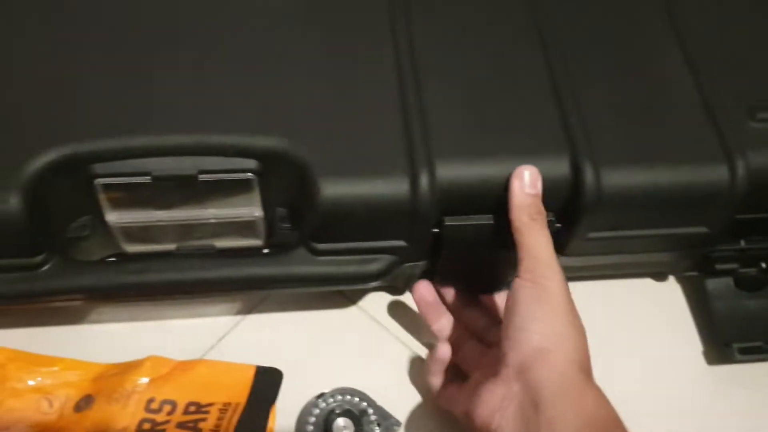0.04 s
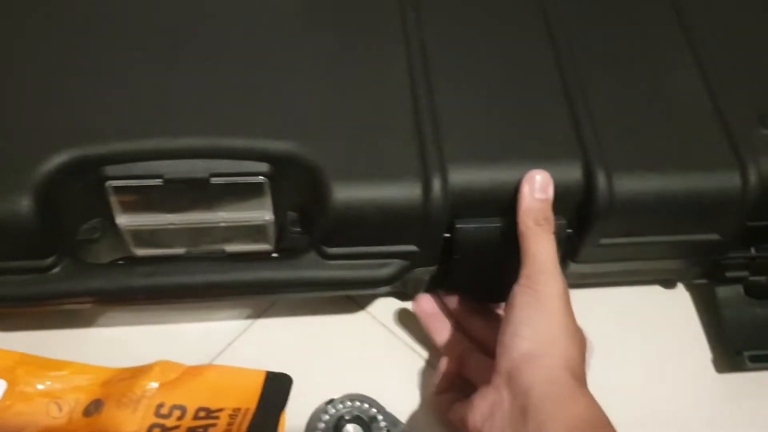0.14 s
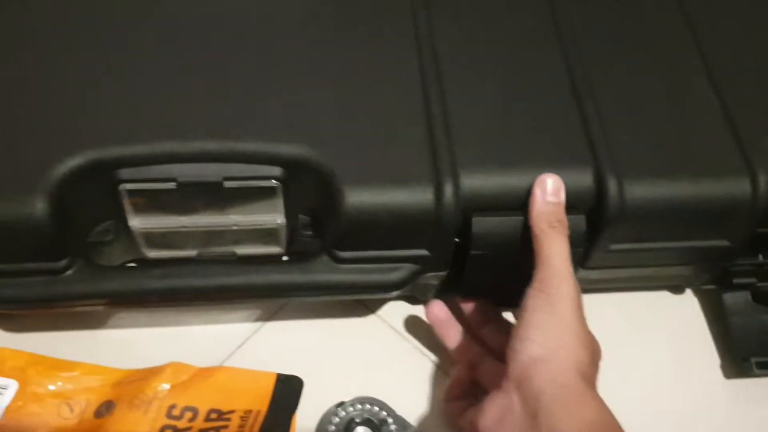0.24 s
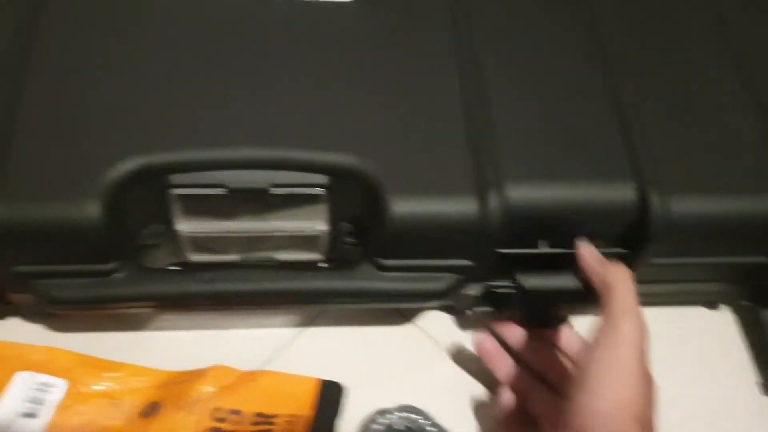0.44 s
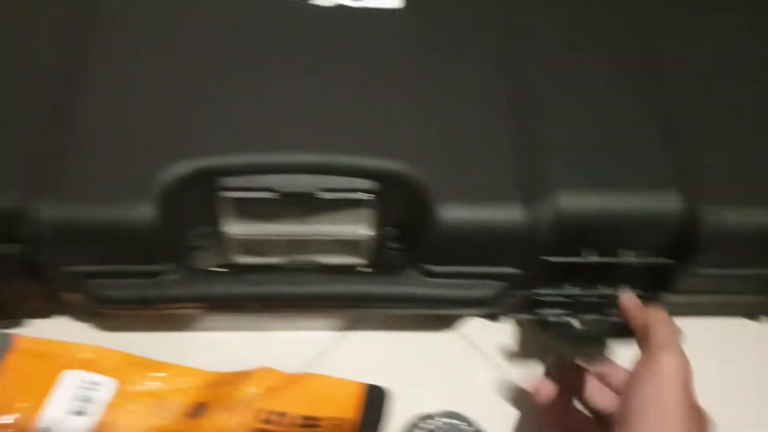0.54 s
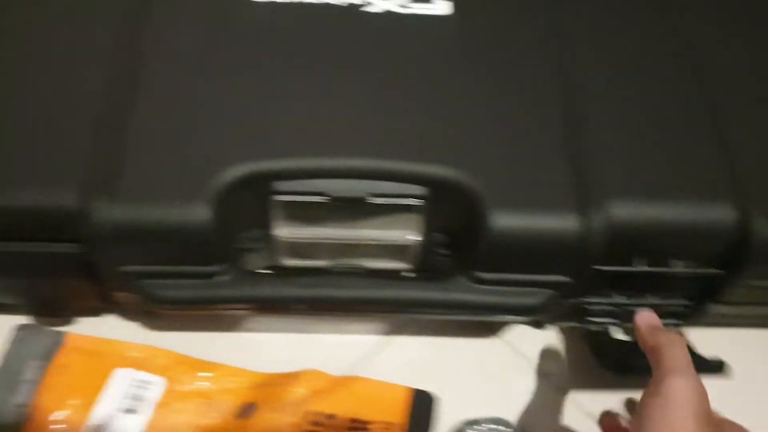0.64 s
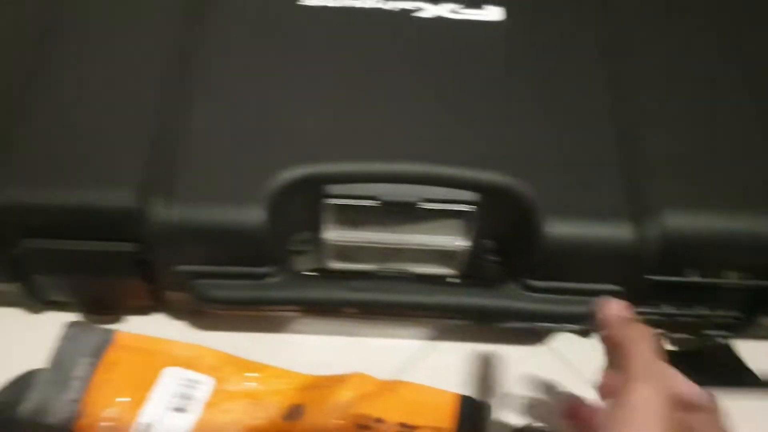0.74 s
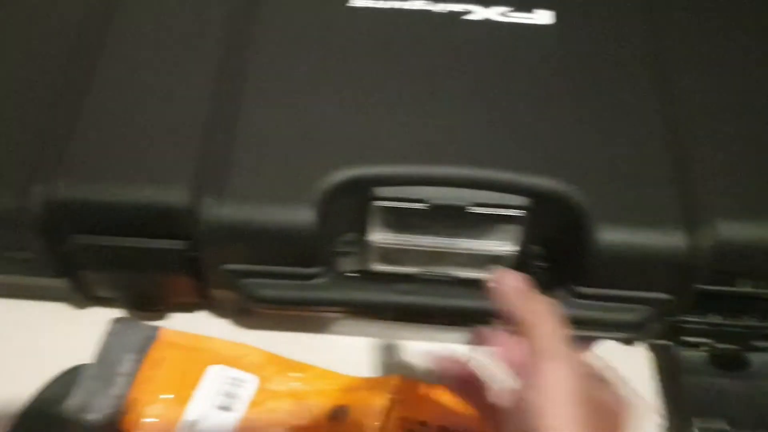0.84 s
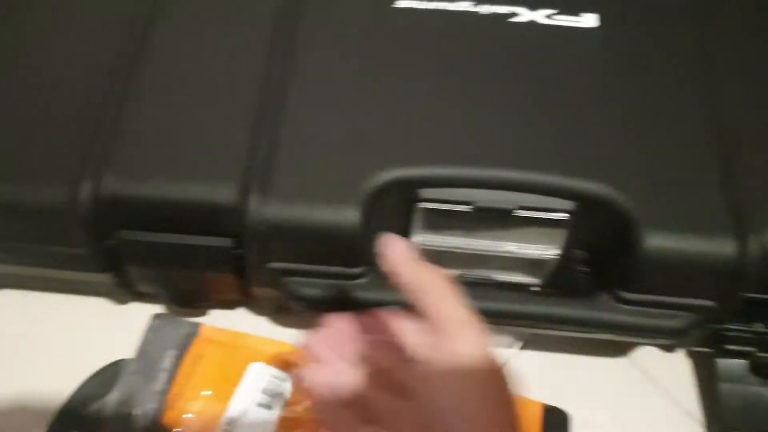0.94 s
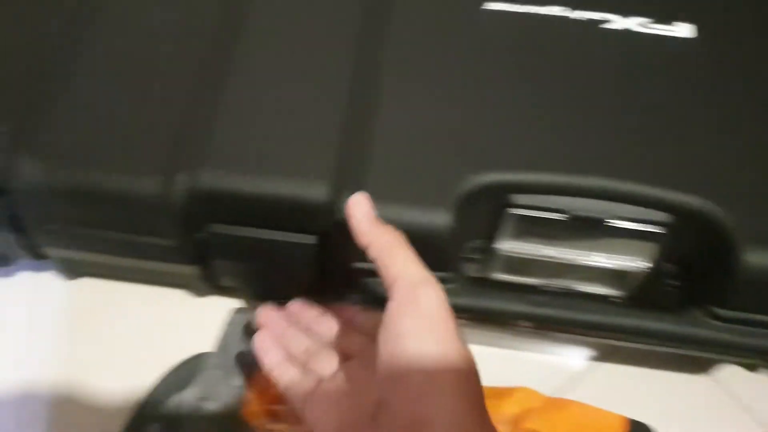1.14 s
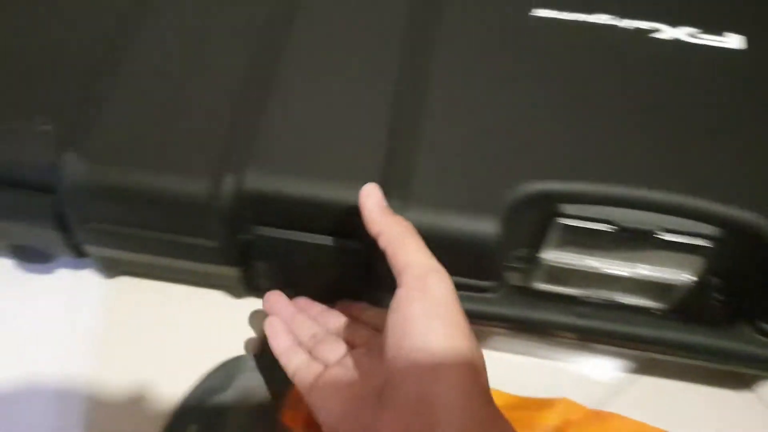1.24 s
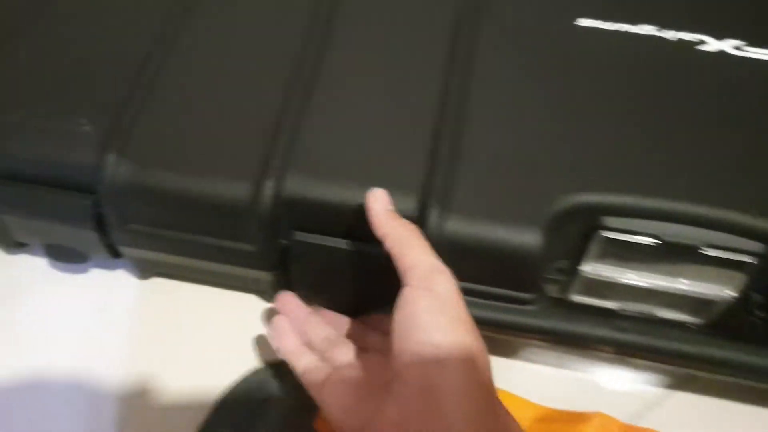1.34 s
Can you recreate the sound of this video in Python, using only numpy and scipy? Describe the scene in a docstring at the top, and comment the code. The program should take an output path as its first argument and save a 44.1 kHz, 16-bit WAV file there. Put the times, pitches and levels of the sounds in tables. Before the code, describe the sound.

One loud, sharp latch snap near the start, hard and slightly clipped, booms briefly in the hollow case shell and the live room; afterwards only dull little hand touches, soft hiss and low handling rumble close to the microphone.

```python
"""Soft hiss, thin hum, low rumble and slow hand rubs lie under the scene, shaped from noise and two tones.
A big hard case then opens in a tiled room, close by and a little to the left: a decaying sine thumps
as the lid springs up, noise cracks clatter for a hundredth of a second, and latch and shell modes ring.
The room answers with a noise tail; later the loose latch and the hand knock softly on the same modes."""
import sys
import numpy as np
from scipy import signal
from scipy.io import wavfile

SR = 44100
rng = np.random.default_rng(int(sys.argv[2]) if len(sys.argv) > 2 else 0)


def store_pcm(level_fs):
    """Save levels as 16-bit WAV."""
    pcm = np.round(np.clip(level_fs, -1, 1) * 32767).astype(np.int16)
    wavfile.write(sys.argv[1], SR, np.atleast_2d(pcm).T)


N = 61739
TIME = np.arange(N) / SR   # seconds

# Catch hitting lip and hinge: start_s, level_db, brightness_hz, left_minus_right_db
SNAPS = [(.2155, -7.5, 14000, 23), (0.2161, -5.5, 5000, 8), (0.2166, 3.5, 4500, 12), (.2192, -3, 5400, 12),
         (.2204, -6.5, 11000, 4.5), (.2219, -3.5, 12000, 8.5), (.2226, -3.5, 4510, 18.5),
         (.2236, -2, 3500, -16), (.2254, 2, 2000, 4.5)]
# Dry crack of one contact: pitch_hz, level_db_per_hz
CRACK_COLOUR = [(150, -13), (400, -9.5), (800, 3), (1500, -3.5), (2600, 4.5), (3700, -3.5), (5200, -20.5),
                (7400, 12.5), (9500, -14.5), (15000, -0.5)]
# Stereo likeness of cracks and rubs: pitch_hz, left_right_likeness (1 = same, 0 = unrelated)
CRACK_LIKENESS = [(100, 1), (1500, 0.7), (8000, 0.36)]
# Shading of the microphone's two ports: pitch_hz, left_minus_right_db
CRACK_PAN = [(400, -5.5), (1300, 1.5), (3000, 4), (5500, -5.5), (9000, -16), (14000, 4)]
CRACK_DB, CRACK_T60_S = 5, 0.0079
# Modes of the latch and the wall around it: pitch_hz, level_db, t60_s
LATCH_MODES = [(701.4, -21.5, .09), (788, -24.5, 0.13), (863, -29.5, 0.069), (1188, -23.5, 0.11),
               (1367, -23.5, 0.094), (1664, -16.5, 0.069), (1760, -35.5, 0.0305), (2330, -24, 0.097),
               (2462, -12, 0.041), (2598, -19.5, 0.055), (3143, -22.5, 0.044), (3504, -16.5, 0.033),
               (4000, -14.5, 0.019), (7160, -19, 0.021), (7380, -15.5, 0.024)]
# The latch springs off its catch
SPRING_S, SPRING_DB, SPRING_HZ, SPRING_PAN_DB = .2162, -5.5, 12200, 29.5

# Modes of the hollow shell: pitch_hz, level_db, t60_s
SHELL_MODES = [(51.6, -28, 0.52), (66.7, -32.5, 0.51), (112.2, -24, 0.27), (130.7, -27.5, 0.4),
               (165, -22, 0.26), (191.4, -26, 0.33), (213.8, -25.5, 0.22), (270, -28, 0.24),
               (313, -20.5, 0.039), (386.2, -24.5, 0.11), (414, -40.5, .25), (508, -35.5, 0.29)]
RELEASE_S, RELEASE_DB, RELEASE_HZ = .2185, 2.5, 1510   # the freed lid sets the shell ringing
THUMP_S, THUMP_HZ, THUMP_DB = .2138, 201.2, -8.5   # the lid's panel springs up
THUMP_ATTACK_S, THUMP_HOLD_S, THUMP_T60_S = 0.0084, 0.00884, 0.022
CASE_PAN_DB = 5   # left minus right

# Soft knocks of latch and hand: start_s, level_db, brightness_hz, low_edge_hz
KNOCKS = [(0.4981, -21, 2390, 260), (0.5013, -28, 1900, 260), (0.51, -21.5, 130, 40.77),
          (0.7456, -25.5, 326, 153), (0.764, -31, 790, 198), (0.931, -21.5, 433, 294),
          (.949, -27, 280, 150), (0.9858, -26, 510, 200), (1.321, -34.5, 500, 202), (1.367, -30, 54.7, 30)]
# Dry sound of a light touch: pitch_hz, level_db_per_hz
TAP_COLOUR = [(150, -9), (400, 7), (900, -1), (1500, -2), (2400, -3.5), (3400, -13), (8000, -30),
              (15000, -40)]
KNOCK_SHELL_DB, KNOCK_LATCH_DB = 1, -22
KNOCK_SHELL_DAMPING = 0.5   # factor on the shell's t60

# Hand sliding on the case: middle_s, half_length_s, level_db
RUBS = [(-0, 0.021, -60), (0.103, 0.062, -58), (0.776, 0.031, -57), (0.962, 0.039, -60),
        (1.345, 0.049, -58)]
# Colour of the sliding skin: pitch_hz, level_db_per_hz
RUB_COLOUR = [(50, -20), (130, -2.5), (220, 0), (400, -2.5), (700, -8), (1500, -12), (3000, -18),
              (6000, -35), (15000, -47)]

# Colour of the room's answer: pitch_hz, level_db_per_hz
ROOM_COLOUR = [(50, -18.5), (110, -1), (200, -7), (400, 1), (800, 2), (1500, -4), (2500, -1.5),
               (3800, -13.5), (5000, -14.5), (7500, -18.5), (10000, -24), (15000, -22.5)]
# Decay of the room: pitch_hz, t60_s
ROOM_T60 = [(60, 0.55), (130, 0.62), (220, 0.45), (600, 0.33), (2000, 0.36), (6000, 0.37), (15000, 0.34)]
# Stereo likeness of room and rumble: pitch_hz, left_right_likeness (below 0 plays as 0)
ROOM_LIKENESS = [(60, 1), (240, 1), (950, 0.15), (3770, -0.7), (15000, -0.05)]
ROOM_DB, ROOM_PAN_DB = -6, 3.5
ROOM_DELAY_S, ROOM_BUILD_S = 0.00087, 0.011
SCATTER_S, SCATTER_DB, SCATTER_HZ = .219, 9.5, 15000   # the clatter as the walls receive it: one broad click
LATCH_SEND_DB, CASE_SEND_DB = -15.5, -13   # shares of latch and case sent to the room

# Colour of the steady hiss: pitch_hz, level_db_per_hz
HISS_COLOUR = [(30, -12.5), (50, 0), (90, -17), (170, -2.5), (260, -14.5), (450, -11), (600, -12),
               (900, -13), (1500, -12.5), (2300, -11), (3600, -15), (4800, -29), (7000, -24), (9000, -56),
               (16000, -48.5)]
# Stereo likeness of the hiss: pitch_hz, left_right_likeness (below 0 plays as 0)
HISS_LIKENESS = [(60, 0.91), (240, 1), (950, -0.016), (3770, -0.43), (15000, -0.2)]
# Side of the hiss: pitch_hz, left_minus_right_db
HISS_PAN = [(60, 10.5), (180, 8), (550, 5), (1650, 9.5), (4970, 5.5), (15000, -39)]
HISS_DB = -57
# Thin wavering tones: pitch_hz, level_db
HUM = [(582, -69.5), (3441, -73)]
HUM_WAVER = 1   # depth beside the steady part
# Handling rumble: time_s, level_db
RUMBLE_LEVEL = [(0, -53.5), (.1, -64.5), (.48, -59), (.54, -48), (.65, -55.5), (.8, -61.5), (1.0, -62),
                (1.1, -66), (1.3, -68), (1.39, -51)]
# Colour of the rumble: pitch_hz, level_db_per_hz
RUMBLE_COLOUR = [(30, -22), (48, 1), (70, -5), (100, -17.5), (300, -31.5), (900, -34.5), (4000, -88)]
# Highest hiss: time_s, level_db
TREBLE_LEVEL = [(0, -71), (.2, -71.5), (.5, -70.5), (.76, -72.5), (.9, -83.5), (1.25, -80.5), (1.29, -69.5),
                (1.4, -70.5)]
# Colour of the highest hiss: pitch_hz, level_db_per_hz
TREBLE_COLOUR = [(2000, -48), (6000, 2.5), (9000, -20), (13500, 8.5), (16000, -10)]
MIC_LOW_HZ, CUTOFF_HZ = 36.2, 15400


def latch():
    """The latch springs free and rings in its modes; each contact of its catch adds a dry crack."""
    spring = contact(SPRING_S, SPRING_DB, SPRING_HZ)
    out = pan(SPRING_PAN_DB) * through(spring, ringing(LATCH_MODES))
    bursts = cracks(CRACK_COLOUR, count=len(SNAPS))
    for (start_s, level_db, bright_hz, pan_db), burst in zip(SNAPS, bursts):
        click = contact(start_s, level_db + CRACK_DB, bright_hz)
        out = out + pan(pan_db) * through(click, burst)
    return out


def lid():
    """The freed panel swings for a few cycles as a decaying sine; the shell's modes boom after it."""
    t = np.maximum(TIME - THUMP_S, 0)
    attack = np.minimum(t / THUMP_ATTACK_S, 1)
    swing = attack * fade(t - THUMP_ATTACK_S - THUMP_HOLD_S, THUMP_T60_S)
    thump = from_db(THUMP_DB) * swing * np.sin(2 * np.pi * THUMP_HZ * t)
    boom = through(contact(RELEASE_S, RELEASE_DB, RELEASE_HZ), ringing(SHELL_MODES))
    return pan(CASE_PAN_DB) * (thump + boom)


def knocks():
    """Light touches tap and ring latch and hand-damped shell; each low edge sets how deep a knock reaches."""
    clicks = sum(low_cut(contact(s, db, hz), low_hz) for s, db, hz, low_hz in KNOCKS)
    shell = from_db(KNOCK_SHELL_DB) * ringing(SHELL_MODES, KNOCK_SHELL_DAMPING)
    loose_latch = from_db(KNOCK_LATCH_DB) * ringing(LATCH_MODES)
    tap, = cracks(TAP_COLOUR, count=1)
    return pan(CASE_PAN_DB) * (through(clicks, shell + loose_latch) + through(clicks, tap))


def rubs():
    """Skin slides over the plastic: dull noise in short swells of pressure."""
    pressure = sum(from_db(db) * np.exp(-((TIME - s) / half_s) ** 2) for s, half_s, db in RUBS)
    return pan(CASE_PAN_DB) * pressure * noise(RUB_COLOUR, CRACK_LIKENESS)


def room(x):
    """Diffuse reflections build up, then die away at a rate that depends on pitch."""
    build = np.clip((TIME - ROOM_DELAY_S) / ROOM_BUILD_S, 0, 1)
    tail = noise(ROOM_COLOUR, ROOM_LIKENESS, ROOM_T60) * build
    tail = rms_one(tail) / np.sqrt(N)   # unit energy
    return from_db(ROOM_DB) * pan(ROOM_PAN_DB) * through(x.mean(axis=0), tail)


def background():
    """Steady coloured hiss under thin hum, handling rumble and a top hiss whose level drifts."""
    hiss = from_db(HISS_DB) * noise(HISS_COLOUR, HISS_LIKENESS, balance=HISS_PAN)
    rumble = from_db(np.interp(TIME, *np.transpose(RUMBLE_LEVEL))) * noise(RUMBLE_COLOUR, ROOM_LIKENESS)
    treble = from_db(np.interp(TIME, *np.transpose(TREBLE_LEVEL))) * noise(TREBLE_COLOUR)
    return hiss + pan(CASE_PAN_DB) * (hum() + rumble + treble)


def hum():
    """Steady tones whose level and phase waver with slow complex noise."""
    out = 0
    for hz, db in HUM:
        waver = signal.resample(rng.standard_normal(size=(16, 2)) @ [1, 1j], N)
        tone = np.real((1 + HUM_WAVER * waver) * np.exp(2j * np.pi * hz * TIME))
        out = out + from_db(db) * rms_one(tone)
    return out


def contact(s, db, hz):
    """One low-passed click; a softer contact is duller."""
    click = np.zeros(N) + 1e-18
    click[int(s * SR)] = from_db(db)
    return signal.sosfilt(signal.butter(2, min(hz, SR * .45), fs=SR, output="sos"), click)


def ringing(modes, damping=1):
    """Impulse response of a set of decaying sine modes, with alternating signs."""
    out = 0
    for k, (hz, db, t60) in enumerate(modes):
        gain = (-1) ** k * from_db(db)
        out = out + gain * np.sin(2 * np.pi * hz * TIME) * fade(TIME, t60 * damping)
    return out


def cracks(colour, count, size=1024):
    """Short noise bursts stand for dense, quickly damped plastic modes; unit energy each."""
    grain = noise(colour, CRACK_LIKENESS, balance=CRACK_PAN)
    out = []
    for k in range(count):
        burst = grain[:, (k + 1) * size:(k + 2) * size] * fade(TIME[:size], CRACK_T60_S)
        out.append(rms_one(burst) / np.sqrt(size))
    return out


def noise(spectrum, likeness=None, t60s=None, balance=None):
    """Stereo noise in half-octave bands, each with its own level, likeness, decay and side; rms 1."""
    edges = 28 * 2 ** np.arange(0, 9.6, .5)
    white = rng.standard_normal((2, 2, N))
    out = 0
    for k, (low, high) in enumerate(zip(edges, edges[1:])):
        band_pass = signal.butter(2, [low, high], "band", fs=SR, output="sos")
        mid, side = signal.sosfilt(band_pass, white[k % 2])   # neighbouring bands use different noise
        hz = np.sqrt(low * high)
        alike = np.clip(at_hz(likeness, hz), 0, 1) if likeness else 0
        stereo = np.sqrt(1 + alike) * mid + np.sqrt(1 - alike) * side * [[1], [-1]]
        band = from_db(at_hz(spectrum, hz)) * stereo
        if t60s:
            band = band * fade(TIME, at_hz(t60s, hz))
        if balance:
            band = band * pan(at_hz(balance, hz))
        out = out + band
    return rms_one(out)


def through(x, response):
    """Play x through an impulse response."""
    return signal.fftconvolve(np.atleast_2d(x), np.atleast_2d(response), axes=-1)[:, :N]


def low_cut(x, hz):
    """Gentle high-pass."""
    return signal.sosfilt(signal.butter(2, hz, "high", fs=SR, output="sos"), x)


def fade(t, t60):
    """Exponential decay from t = 0, down 60 dB after t60 seconds."""
    return np.exp(-np.log(1000) * np.maximum(t, 0) / t60)


def pan(db):
    """Left and right gains whose mean is one; positive dB leans left."""
    gains = from_db([[db / 2], [-db / 2]])
    return gains / gains.mean()


def at_hz(points, hz):
    """Read a table on a log-frequency axis."""
    rows = np.array(points)
    return np.interp(np.log(hz), np.log(rows[:, 0]), rows[:, 1])


def rms_one(x):
    """Scale to unit power."""
    return x / np.sqrt(np.mean(x ** 2) + 1e-20)


def from_db(db):
    """Decibels to gain."""
    return 10 ** (np.asarray(db) / 20)


def scene():
    """The case in its room; the latch radiates all round, so its echo is smoother than its direct sound."""
    snap = latch()
    body = lid() + knocks()
    scatter = contact(SCATTER_S, SCATTER_DB, SCATTER_HZ)
    radiated = scatter + from_db(LATCH_SEND_DB) * snap + from_db(CASE_SEND_DB) * body
    return snap + body + room(radiated) + rubs() + background()


def record(dry):
    """The microphone loses the deepest bass, the highest peaks are clipped and the top is cut."""
    clipped = np.clip(low_cut(dry, MIC_LOW_HZ), -.9, .9)
    return signal.sosfilt(signal.ellip(10, .1, 80, CUTOFF_HZ, fs=SR, output="sos"), clipped)


dry = scene()
out = record(dry)
store_pcm(out)
```